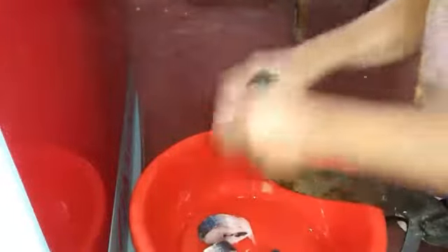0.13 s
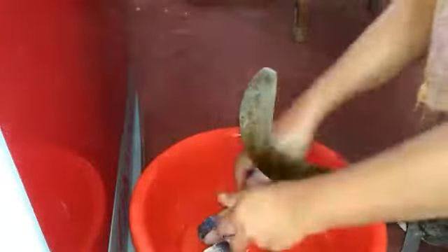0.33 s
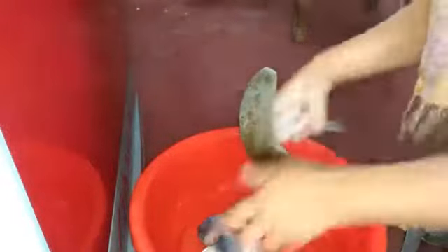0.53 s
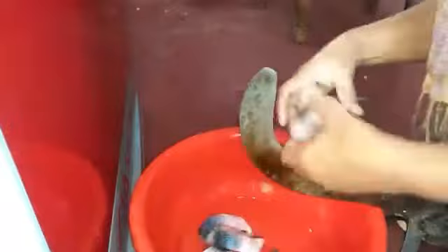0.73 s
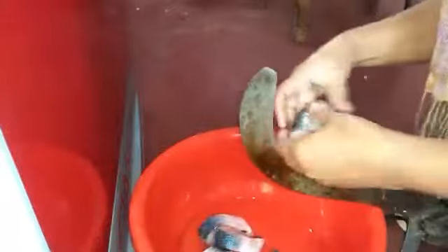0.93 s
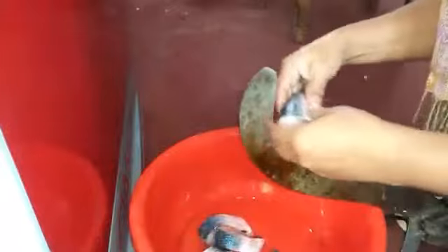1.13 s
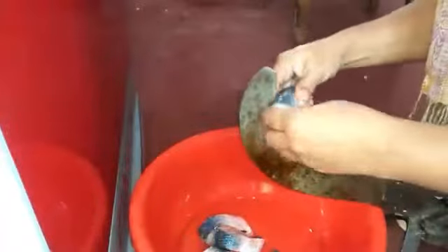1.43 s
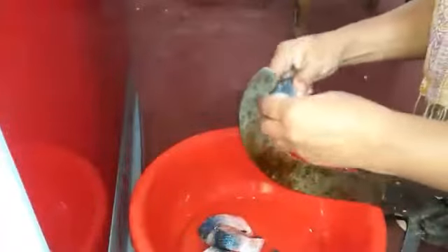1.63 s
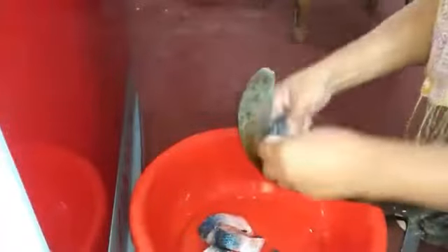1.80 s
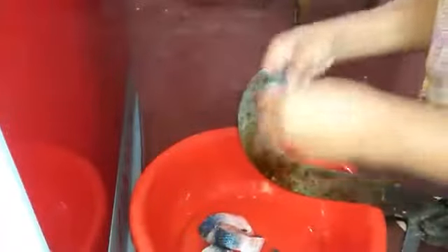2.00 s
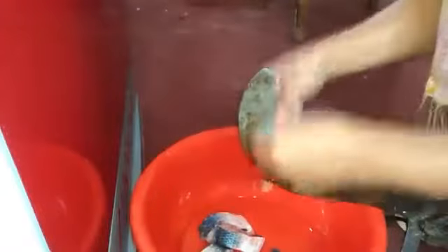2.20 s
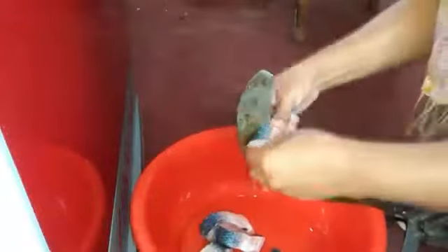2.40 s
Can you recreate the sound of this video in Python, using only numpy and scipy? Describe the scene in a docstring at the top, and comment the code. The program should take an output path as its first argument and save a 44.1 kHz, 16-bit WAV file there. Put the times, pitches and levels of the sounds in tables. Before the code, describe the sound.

Cutting fish on a fixed curved blade: bright metallic scuffs, hollow knocks, a piece slapping into plastic

```python
"""In a hard-walled kitchen, fish is drawn in short strokes against an upright metal blade above a plastic bowl.
Contacts are noise puffs that ring the metal's modes; the stand knocks and scrapes near 1 kHz as puffs and
friction grains drive its modes. Grains also make wet scales rustle in the treble; cut pieces smack the bowl
as dull noise puffs. Faint hoarse tones, wavering bands of noise, pass before the last strokes and among them.
A diffuse tail follows the hits; under it all lie shaped noises: a faint floor and a low rumble."""
import sys
import numpy as np
from scipy import signal
from scipy.fft import rfft, irfft
from scipy.io import wavfile

SR = 44100
rng = np.random.default_rng(int(sys.argv[2]) if len(sys.argv) > 2 else 0)


def log_audio(samples):
    """Write samples as a 16-bit WAV file to the path given in sys.argv[1]."""
    # one column per channel
    frames = np.atleast_2d(samples).T
    # limit to full scale, then quantise
    limited = np.clip(frames, -1, 1)
    pcm = np.round(limited * 32767).astype(np.int16)
    wavfile.write(sys.argv[1], SR, pcm)


N = 112454  # length [samples]


def amp(db):
    """Decibels to linear amplitude."""
    return 10 ** (np.asarray(db) / 20)


def unit_rms(x):
    """Scales a sound to an RMS of 1."""
    return x / np.sqrt(np.mean(x ** 2) + 1e-20)


def unit_peak(x):
    """Scales a sound to a peak of 1."""
    return x / (abs(x).max() + 1e-12)


def read(points, hz):
    """Reads a table over frequency, interpolating along a log axis."""
    table_hz, value = np.transpose(points)
    return np.interp(np.log(hz + 1), np.log(table_hz + 1), value)


def colour(x, points):
    """Filters by a spectrum table."""
    gain = amp(read(points, np.fft.rfftfreq(len(x), 1 / SR)))
    return irfft(rfft(x) * gain, len(x))


def curve(points):
    """Linear gain over the whole scene from a table of levels."""
    s, db = np.transpose(points)
    return amp(np.interp(np.arange(N) / SR, s, db))


def add(mix, s, sound):
    """Lays a sound into the mix at a time in seconds."""
    part = mix[round(s * SR):][:len(sound)]
    part += sound[:len(part)]


def burst(noise, length):
    """A short puff of contact noise that swells and dies over a few times its length."""
    u = np.arange(len(noise)) / SR / max(length, .0003)
    return noise * u * np.exp(-u)


SOFT_S = 0.0013  # modes build up over this time


def ring(modes, boost_db=0, detune=1, phase=0):
    """Impulse response of a set of dying modes."""
    hz, db, t60 = np.transpose(modes)[..., None]
    t = np.arange(12000) / SR
    decay = amp(db + boost_db - 60 * t / np.maximum(t60, .004))  # no mode dies faster than 4 ms
    waves = np.sin(2 * np.pi * hz * detune * t + phase)
    return (1 - np.exp(-(t / SOFT_S) ** 2)) * (decay * waves).sum(0)


# Clinks and scuffs on the blade:
# (time [s], scuff peak [dB], focus of the ring [Hz], contact length [s], ring relative to scuff [dB])
BLADE_CLINKS = [(0.06, -22, 8640, 0.0043, -23), (0.084, -24.5, 10900, 0.0034, -21),
                (0.100, -25, 9490, 0.0021, -28), (0.172, -31.5, 8000, 0.0074, -15),
                (0.188, -24.5, 10000, .006, -26), (0.211, -28, 9200, 0.0031, -28),
                (0.2254, -16, 8760, .0012, 1), (0.256, -42, 10700, 0.0029, -38),
                (0.328, -31.5, 8000, 0.0095, -32), (0.3632, -11.5, 9800, 0.0059, -12),
                (0.3692, -8, 5400, 0.0019, 0), (0.388, -11.5, 9650, .003, -16),
                (0.6687, -27.5, 8000, 0.001, -20), (1.930, -41, 10800, 0.002, -15),
                (1.992, -40, 10900, 0.0011, -12), (2.06, -45, 9700, .003, -0.5),
                (2.162, -30.5, 9700, 0.0032, -6), (2.187, -29.5, 9520, .003, -1),
                (2.221, -20.5, 7500, 0.0024, -16), (2.2512, -14, 10450, .0011, -22),
                (2.364, -38.5, 9600, 0.0032, -0.5), (2.399, -18, 7720, 0.00092, -20.5),
                (2.479, -40, 9500, 0.0026, -3), (2.518, -37, 12000, 0.0024, -18)]
# Modes of the metal, before detuning and boost: (frequency [Hz], level [dB], t60 [s])
METAL_MODES = [(4910, -20, .12), (5860, -16, .12), (6440, -16, .2), (6798, -4, .2), (7730, -9, .12),
               (8712, -4, .13), (8825, -6, .07), (9606, -2, .17), (9735, -4, .28), (9835, -4, .14),
               (10790, -9, .27), (11785, -3, .32), (11890, -7, .12), (12820, -8, .25)]
# Spectrum of the scuff: (frequency [Hz], level [dB])
SCUFF_SPECTRUM = [(300, -59), (700, -33.5), (1100, -38.5), (2260, -24), (3180, -21.5), (5000, -12),
                  (7000, -11.5), (9000, 2.5), (12000, -5.5), (14300, -8)]
FOCUS_OCT, FOCUS_DB = .04, 18  # width and height of the boost around the focus pitch


def clinks():
    """Each contact is a bright scuff that rings the metal; modes close to the focus pitch ring louder."""
    out, t = np.zeros(N), np.arange(12000) / SR
    hz = np.array(METAL_MODES)[:, :1]
    noises = rng.standard_normal((len(BLADE_CLINKS), 4096))
    for (s, db, focus_hz, length, ring_db), noise in zip(BLADE_CLINKS, noises):
        # a focus far from every mode leaves the balance even
        focus_db = FOCUS_DB * np.exp(-(np.log2(hz / focus_hz) / FOCUS_OCT) ** 2)
        detune = 1 + 0.0009 * noise[:len(hz), None]
        phase = 10 * noise[-len(hz):, None]
        rung = ring(METAL_MODES, focus_db, detune, phase)
        rung = rung * np.minimum(t / length, 1)  # fades in over the contact
        scuff = burst(colour(noise, SCUFF_SPECTRUM), length)
        add(out, s, amp(db + ring_db) * unit_peak(rung))
        add(out, s, amp(db) * unit_peak(scuff))
    return out


BODY_FLOOR_HZ = 590


def hollow(x):
    """The small body radiates no bass: a steep high-pass."""
    return signal.sosfilt(signal.butter(4, BODY_FLOOR_HZ, "high", fs=SR, output="sos"), x)


# Friction level of the stand before SCRAPE_DB: (time [s], level [dB])
SCRAPE_LEVEL = [(0.0, -36), (0.18, -44), (0.41, -41), (0.51, -55), (0.58, -55), (0.75, -68), (0.85, -71.5),
                (1.23, -70.5), (1.52, -68), (1.74, -59), (1.94, -58.5), (2.06, -47.5), (2.16, -38.5),
                (2.26, -55.5), (2.43, -38), (2.55, -50)]
# Rustle of the scales: (time [s], level [dB])
SCALES_LEVEL = [(0, -52), (.13, -54), (.2, -45.5), (.33, -56.5), (.41, -27), (.55, -46), (.64, -56),
                (.79, -66), (.87, -85.5), (1.03, -85.5), (1.08, -72), (1.17, -69), (1.25, -77),
                (1.275, -64.5), (1.33, -66.5), (1.4, -76.5), (1.48, -71), (1.54, -76), (1.6, -72.5),
                (1.66, -72.5), (1.76, -68.5), (1.83, -61), (1.92, -63), (2.0, -62), (2.09, -51.5),
                (2.15, -55.5), (2.19, -40), (2.28, -52.5), (2.36, -50), (2.43, -52.5), (2.55, -56.5)]
# Spectrum of the rustle: (frequency [Hz], level [dB])
RUSTLE_SPECTRUM = [(1470, -44), (2500, -11.5), (3040, -28.5), (3820, -17), (5300, -21.5), (6940, -10),
                   (9430, -4), (11200, -8.5), (14300, -13)]
# Modes of the stand and bowl, also played by the knocks: (frequency [Hz], level [dB], t60 [s])
BODY_MODES = [(450, -6, 0.059), (828, -18, 0.11), (886, -8, .03), (949.6, 9.5, .035), (1035, 9, 0.06),
              (1127, -9.5, 0.014)]
# Their harder upper mids, t60 raised to 4 ms where shorter: (frequency [Hz], level [dB], t60 [s])
UPPER_MODES = [(1250, -6, .008), (1492, -4, .025), (1775, -5, .025), (1997, -1, .018), (2285, -2, .014),
               (2650, -7, .01), (3400, -12, .003)]
GRAINS_PER_S, GRAIN_DB, SCRAPE_DB = 5900, 2.5, -9  # GRAIN_DB sets the unevenness


def strokes():
    """Dense uneven grains of friction drive the body of the stand and rustle in the treble."""
    size = amp(GRAIN_DB * np.minimum(rng.exponential(1, (2, N)), 4))
    struck = rng.random((2, N)) < GRAINS_PER_S / SR
    grains = size * struck * rng.choice([-1, 1], (2, N))
    body = ring(BODY_MODES) + amp(-16.5) * ring(UPPER_MODES)
    scrape = unit_rms(hollow(signal.oaconvolve(grains[0], body)[:N]))
    rustle = unit_rms(colour(grains[1], RUSTLE_SPECTRUM))
    return scrape * curve(SCRAPE_LEVEL) * amp(SCRAPE_DB) + rustle * curve(SCALES_LEVEL)


# Knocks of the stand and bowl, before the trims below and the high-pass:
# (time [s], level [dB], upper mids relative to body [dB], length, halved for the puff [s])
STAND_KNOCKS = [(0.031, -37, -29, 0.0087), (0.062, -35.5, -5, 0.0083), (0.081, -31.5, -18, 0.013),
                (0.1, -33, -7, 0.0027), (0.126, -41.5, -14, 0.0078), (0.198, -35, -8.5, 0.015),
                (0.223, -27.5, -13, 0.0048), (0.254, -26.5, -20, 0.0037), (0.253, -22.5, -10, 0.0043),
                (0.291, -33.5, -33, 0.012), (0.368, -19.5, -7, 0.015), (0.388, -10, -2, 0.0053),
                (0.403, -23.5, 2.5, 0.014), (0.415, -14.5, -16.5, 0.0073), (1.871, -38.5, -24.5, 0.0049),
                (2.106, -30.5, -38, 0.0027), (2.16, -35.5, -6, 0.0058), (2.171, -25, -41, 0.0036),
                (2.179, -26, -8.5, 0.0053), (2.187, -36, -44, 0.015), (2.195, -31.5, -10, 0.015),
                (2.207, -34, -6, 0.0058), (2.217, -37, -11, 0.0081), (2.225, -37.5, -1, 0.0019),
                (2.237, -35, -28, 0.004), (2.258, -32.5, -31, 0.0025), (2.265, -42, -8, 0.0031),
                (2.373, -39.5, -6, 0.01), (2.398, -35, -4, 0.004), (2.436, -48.5, -15, 0.0035),
                (2.488, -32.5, -18, 0.0059)]
KNOCK_DB, THUD_DB = -1, -32  # trims of the knock and its thud


def knocks():
    """Blows pass into the stand and the bowl: a hollow 1 kHz body, harder upper mids and a low thud."""
    out, thuds, t = np.zeros(N), np.zeros(N), np.arange(8192) / SR
    split, count = len(BODY_MODES), len(BODY_MODES) + len(UPPER_MODES)
    thud = np.sin(2 * np.pi * 65 * t) + .7 * np.sin(2 * np.pi * 155 * t)
    thud = thud + 0.79 * np.sin(2 * np.pi * 300 * t)
    noises = rng.standard_normal((len(STAND_KNOCKS), 4096))
    for (s, db, upper_db, length), noise in zip(STAND_KNOCKS, noises):
        hit = burst(noise, length / 2)
        detune = 1 + 0.016 * noise[-count:, None]
        body = unit_peak(signal.fftconvolve(hit, ring(BODY_MODES, 0, detune[:split])))
        upper = unit_peak(signal.fftconvolve(hit, ring(UPPER_MODES, 0, detune[split:])))
        add(out, s - .001, amp(db + KNOCK_DB) * (body + amp(upper_db) * upper))
        add(thuds, s, amp(db + THUD_DB - 60 * t / 0.37) * thud)  # t60 0.37 s
    return hollow(out) + thuds


# Pieces landing in the bowl: (time [s], peak [dB], length [s])
BOWL_SLAPS = [(0.368, -19.5, 0.0021), (0.39, -16.5, 0.0043), (0.6685, -24, .0015), (0.685, -36.5, 0.0097),
              (0.723, -41.5, 0.0021)]
# Spectrum of the smack: (frequency [Hz], level [dB])
SLAP_SPECTRUM = [(150, -42), (250, -10), (385, -22.5), (437, -10), (1070, -4.5), (1230, -2.5), (2710, -7.5),
                 (3120, -13.5), (7000, -24.5), (9100, -55), (15400, -120)]


def slaps():
    """Broad dull smacks on the plastic, without a ring."""
    out = np.zeros(N)
    noises = rng.standard_normal((len(BOWL_SLAPS), 4096))
    for (s, db, length), noise in zip(BOWL_SLAPS, noises):
        smack = burst(colour(noise, SLAP_SPECTRUM), length)
        add(out, s, amp(db) * unit_peak(smack))
    return out


# Faint hoarse tones: (start [s], length [s], frequency [Hz], width [Hz], level [dB])
HOARSE_TONES = [(1.52, .28, 1612, 74, -59), (1.56, .11, 815, 59, -54), (1.585, 0.074, 955, 67, -51),
                (1.635, .04, 490, 51, -60.5), (1.715, 0.36, 610, 66, -57), (1.85, 0.17, 667, 10, -53),
                (1.969, 0.16, 938, 31, -43), (1.861, .2, 1620, 270, -61), (1.80, 0.46, 1500, 210, -64),
                (1.99, .17, 1440, 50, -60), (1.865, .11, 985, 90, -54), (2.06, .08, 4900, 200, -63),
                (1.925, .014, 2200, 150, -57), (1.985, .02, 2290, 100, -58), (2.093, .022, 2250, 150, -55),
                (1.10, 0.059, 13000, 300, -70), (2.5, 0.06, 2450, 100, -58),
                (2.39, 0.057, 2600, 310, -54.5), (2.48, .04, 2450, 250, -60), (2.35, 0.14, 1600, 90, -55),
                (2.215, 0.017, 3850, 120, -53)]


def tones():
    """Narrow wavering bands of noise, each around a weak steady tone, that swell and fade."""
    out = np.zeros(N)
    for start, length, hz, width_hz, db in HOARSE_TONES:
        t = np.arange(0, length, 1 / SR)
        r = np.exp(-np.pi * width_hz / SR)  # pole radius of the two-pole low-pass
        a, b = rng.standard_normal((2, SR // 2))
        waver = signal.lfilter([1], [1, -2 * r, r * r], a + 1j * b)[-len(t):]
        waver = 0.21 + waver / np.sqrt(np.mean(abs(waver) ** 2))  # 0.21 is the steady part
        tone = (waver * np.exp(2j * np.pi * hz * t)).real
        add(out, start, amp(db) * np.sin(np.pi * t / length) ** 0.18 * tone)
    return out


# Decay of the kitchen: (frequency [Hz], t60 [s])
ROOM_DECAY = [(200, 0.38), (500, 0.65), (1000, 0.49), (2500, 0.43), (5000, 0.47), (9000, 0.31),
              (14000, 0.25)]
ROOM_DB, ROOM_DELAY_S = -7, .008


def room(x):
    """Diffuse tail, each band dying at its own speed."""
    hz, t, z = signal.stft(rng.standard_normal(SR), SR, nperseg=256)
    decay = amp(-60 * t / read(ROOM_DECAY, hz)[:, None])
    tail = signal.istft(z * decay, SR, nperseg=256)[1]
    tail = np.r_[np.zeros(round(ROOM_DELAY_S * SR)), tail]
    return signal.fftconvolve(x, tail / np.linalg.norm(tail))[:N]


# Spectrum of the steady floor: (frequency [Hz], level [dB])
FLOOR_SPECTRUM = [(130, -36), (220, -7.5), (347, -2.5), (372, -22), (404, -6), (512, -4.5), (914, -8.5),
                  (1110, -7.5), (1850, -14), (6000, -39), (7800, -62), (13200, -120)]
FLOOR_DB = -65.5  # RMS level of the floor
# Level of the rumble: (time [s], level [dB])
RUMBLE_LEVEL = [(0.0, -66), (0.09, -52.5), (0.33, -60), (0.37, -47.5), (0.51, -49.5), (0.62, -62),
                (1.2, -65.5), (1.23, -57.5), (1.35, -67), (1.39, -59), (1.62, -66), (1.65, -58.5),
                (1.84, -66), (1.87, -61), (2.21, -62.5), (2.24, -58), (2.52, -59), (2.55, -74)]
# Spectrum of the rumble: (frequency [Hz], level [dB])
RUMBLE_SPECTRUM = [(12, -45), (20, -17), (22, -23.5), (54, -5.5), (86, -4.5), (108, 0), (124, -0.5),
                   (140, -14), (162, -5), (260, -17), (340, -41), (570, -120)]


def kitchen():
    """A faint steady floor and a lumpy low rumble, both of shaped noise."""
    a, b = rng.standard_normal((2, N))
    # the leading point holds everything under 150 Hz at -58.5 dB
    floor = unit_rms(colour(a, [(150, -58.5)] + list(FLOOR_SPECTRUM)))
    # the closing point holds everything over 330 Hz at -65 dB
    rumble = unit_rms(colour(b, list(RUMBLE_SPECTRUM) + [(330, -65)]))
    return amp(FLOOR_DB) * floor + curve(RUMBLE_LEVEL) * rumble


def scene():
    """The hits and tones feed the room; strokes and background stay dry."""
    hits = clinks() + knocks() + slaps() + tones()
    return (hits + amp(ROOM_DB) * room(hits) + strokes() + kitchen())[None]


EDGE_HZ = 14350


def record(dry):
    """The band limit: a steep low-pass."""
    low_pass = signal.firwin(511, EDGE_HZ, window=("kaiser", 9), fs=SR)
    return signal.oaconvolve(dry, low_pass[None], "same")


dry = scene()
out = record(dry)
log_audio(out)
```